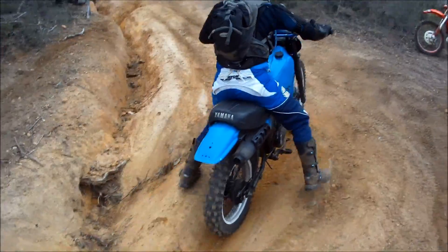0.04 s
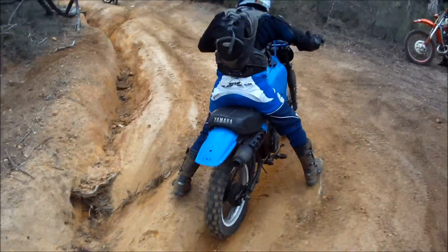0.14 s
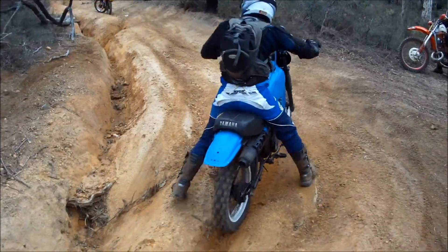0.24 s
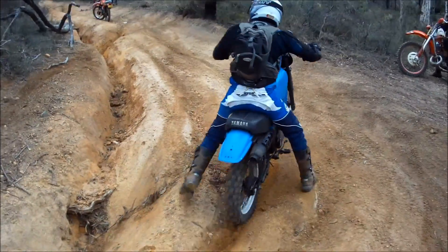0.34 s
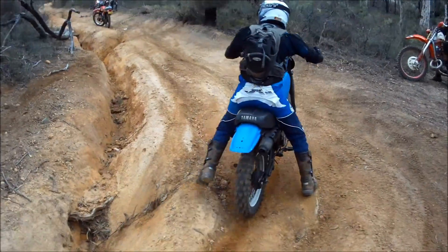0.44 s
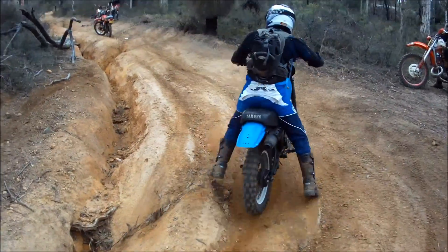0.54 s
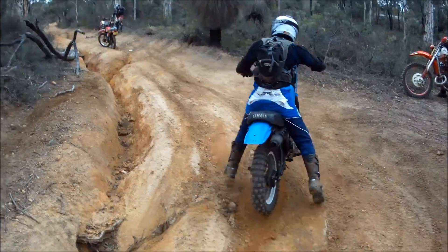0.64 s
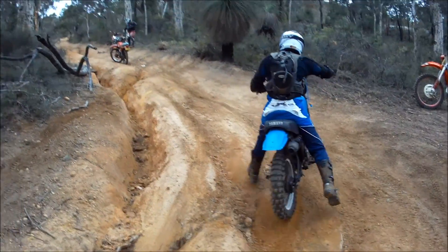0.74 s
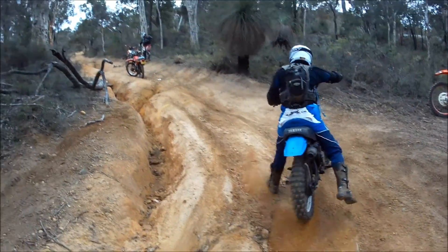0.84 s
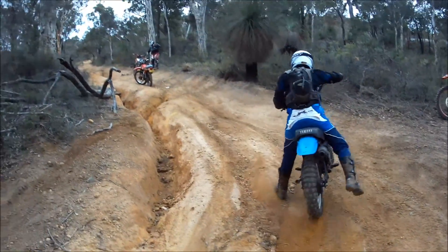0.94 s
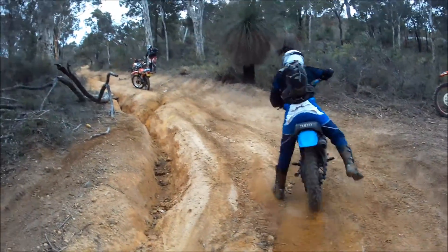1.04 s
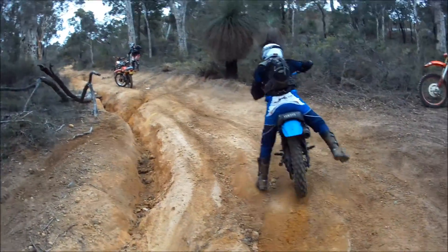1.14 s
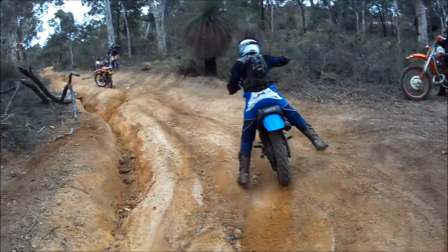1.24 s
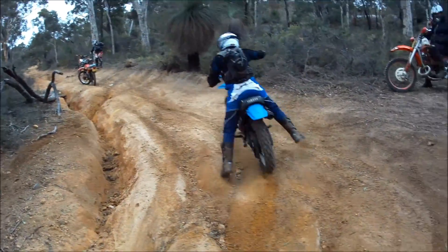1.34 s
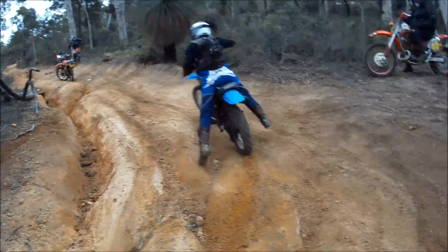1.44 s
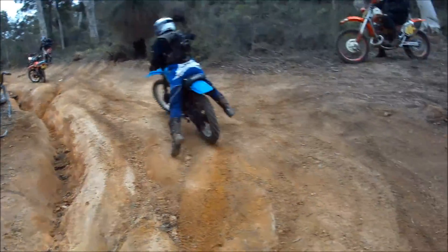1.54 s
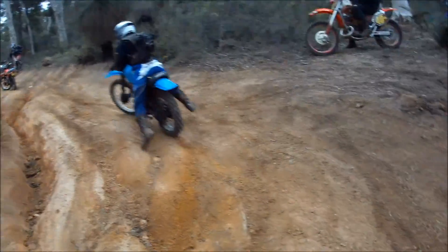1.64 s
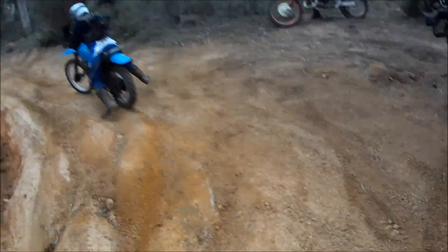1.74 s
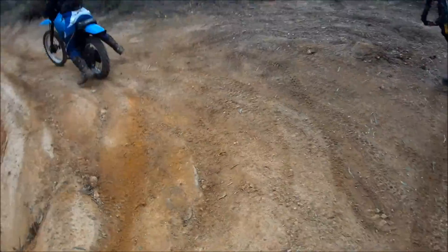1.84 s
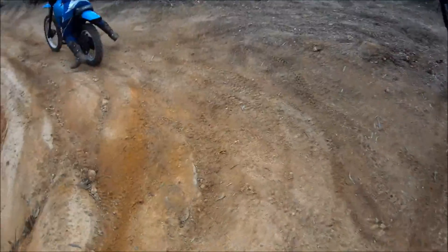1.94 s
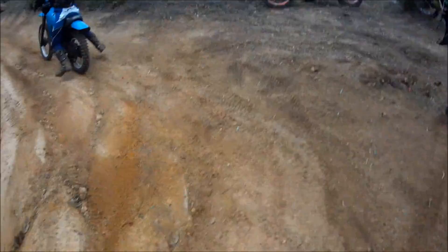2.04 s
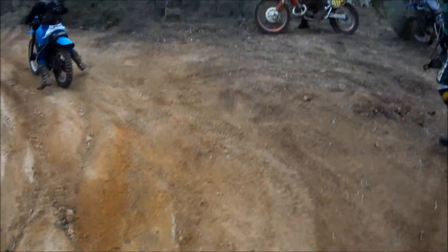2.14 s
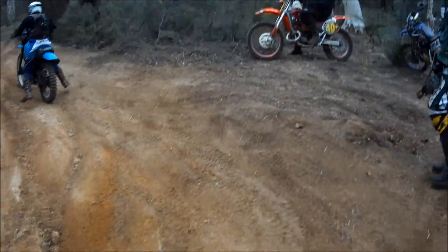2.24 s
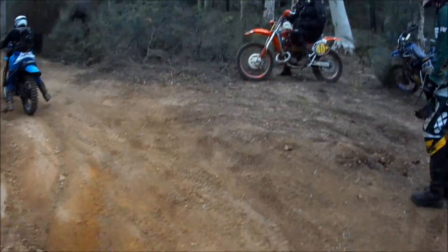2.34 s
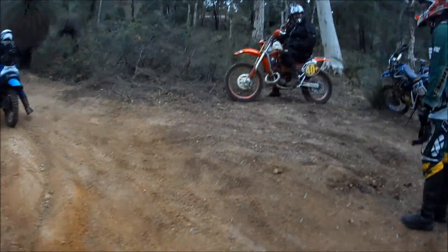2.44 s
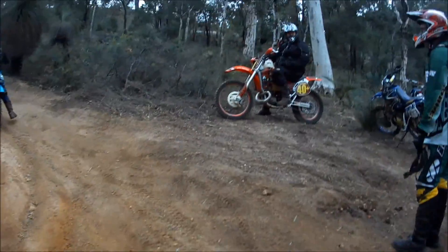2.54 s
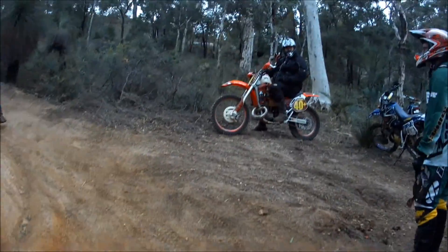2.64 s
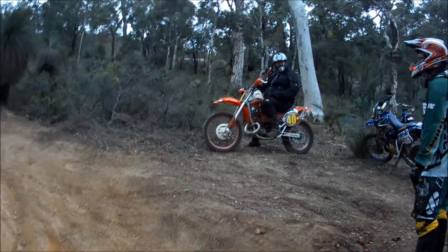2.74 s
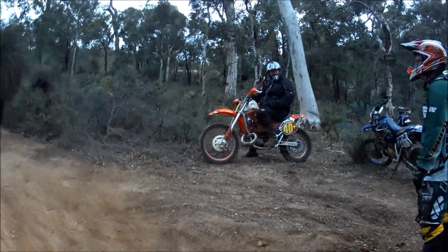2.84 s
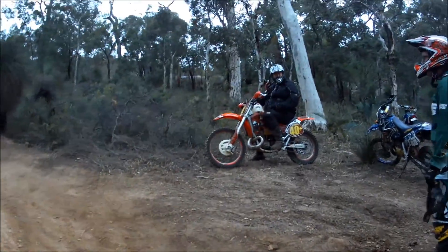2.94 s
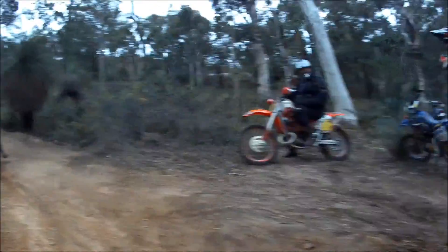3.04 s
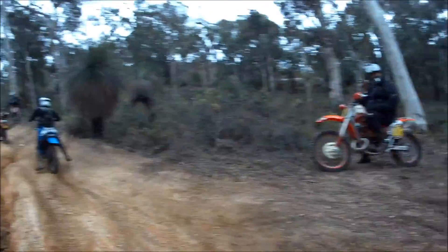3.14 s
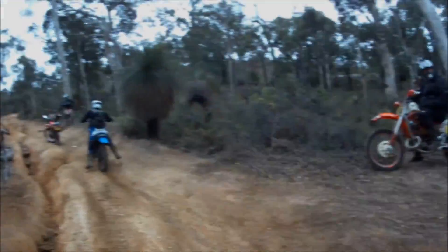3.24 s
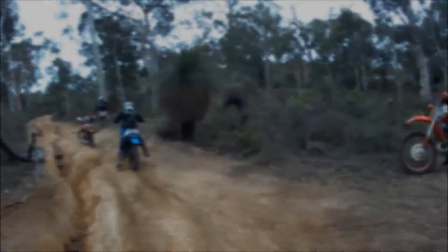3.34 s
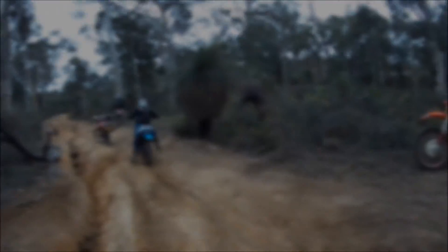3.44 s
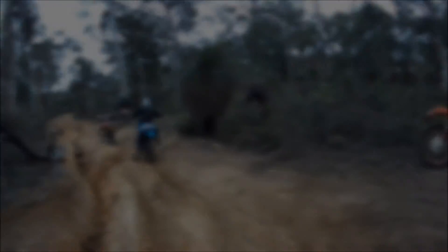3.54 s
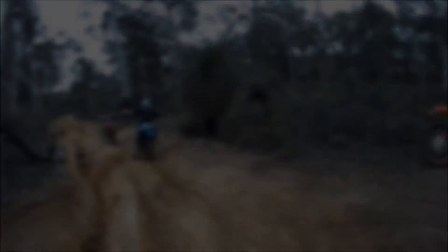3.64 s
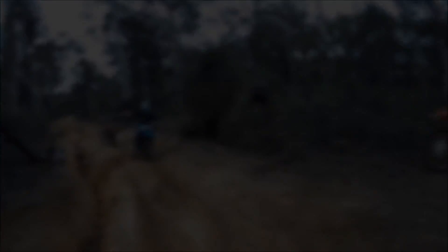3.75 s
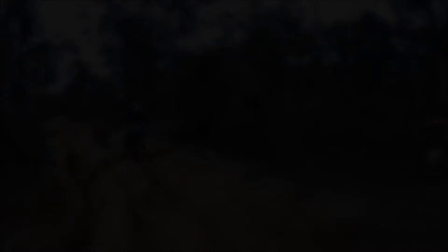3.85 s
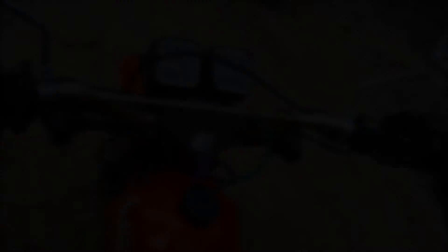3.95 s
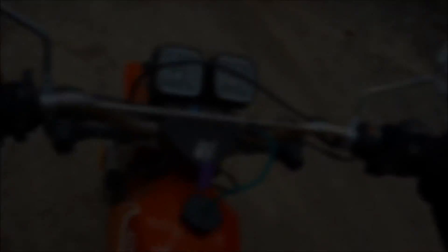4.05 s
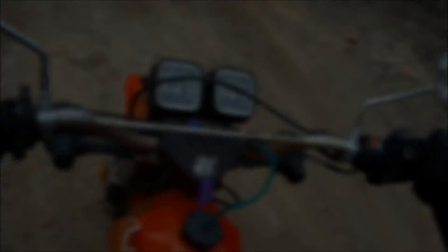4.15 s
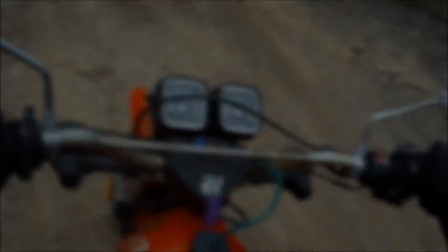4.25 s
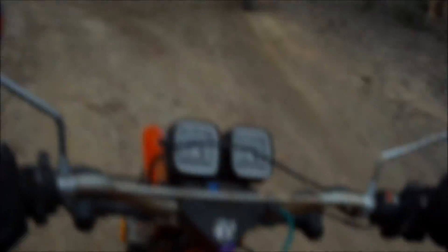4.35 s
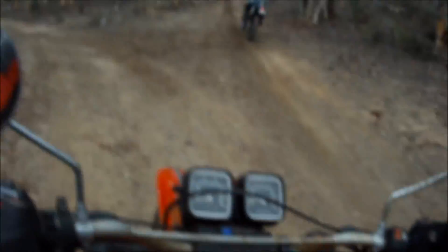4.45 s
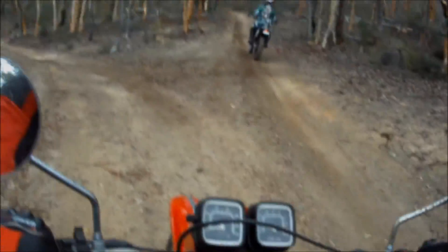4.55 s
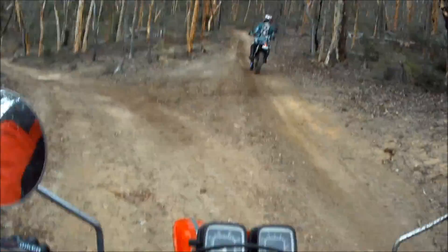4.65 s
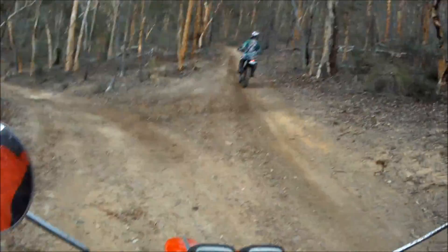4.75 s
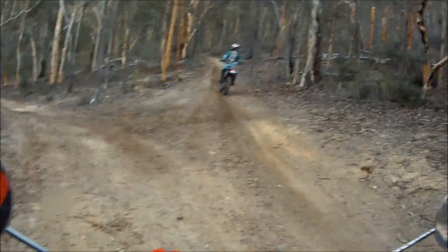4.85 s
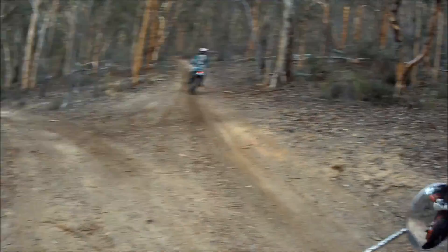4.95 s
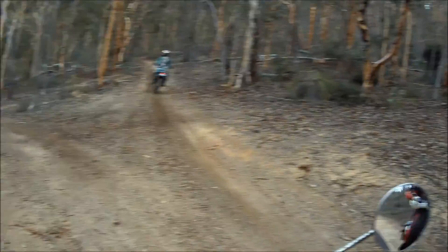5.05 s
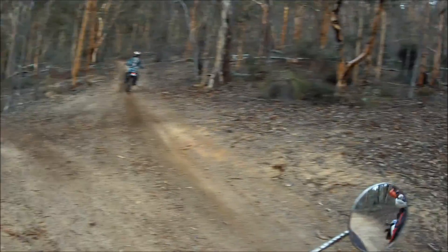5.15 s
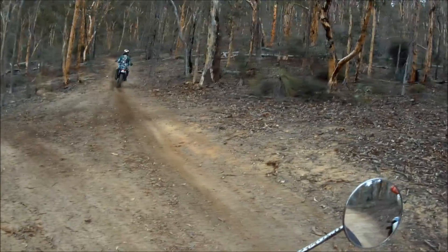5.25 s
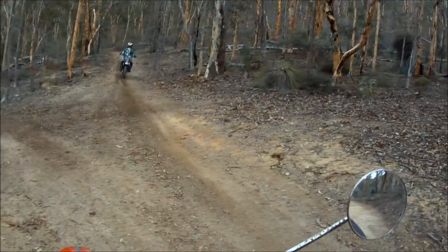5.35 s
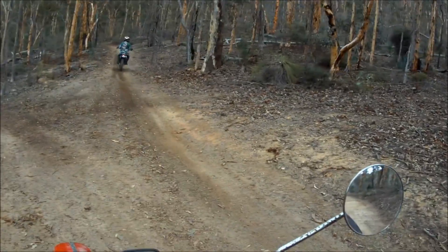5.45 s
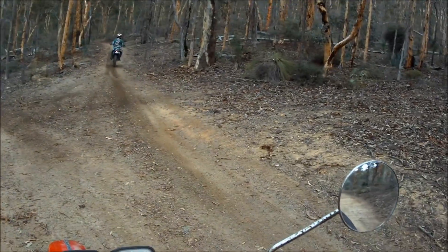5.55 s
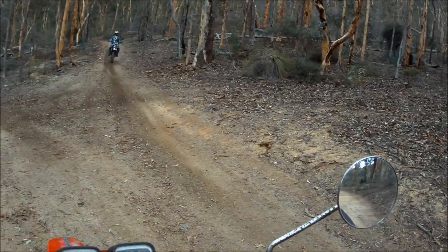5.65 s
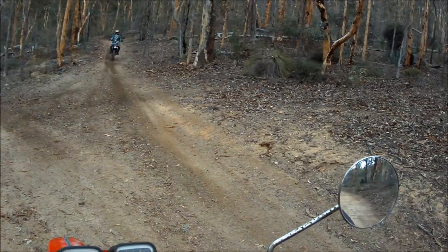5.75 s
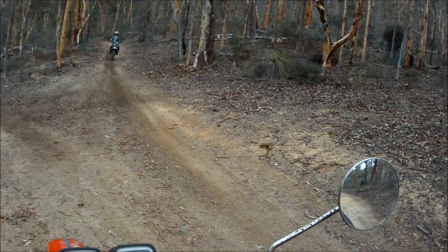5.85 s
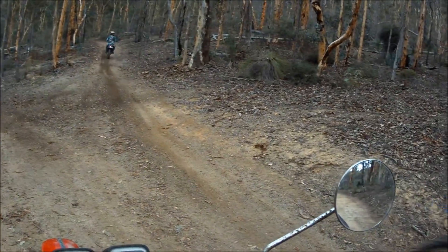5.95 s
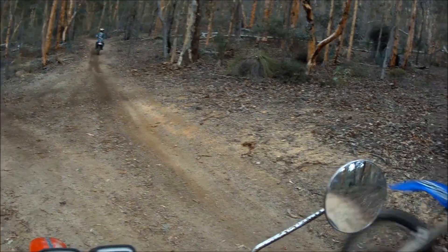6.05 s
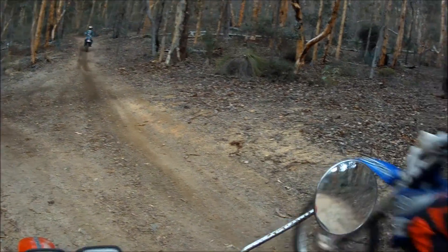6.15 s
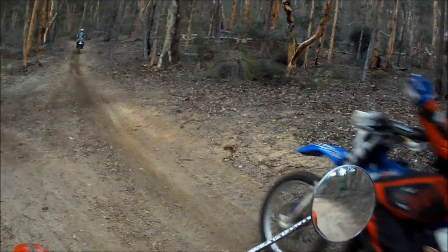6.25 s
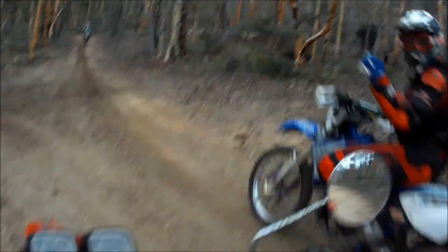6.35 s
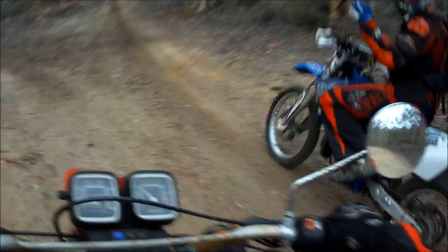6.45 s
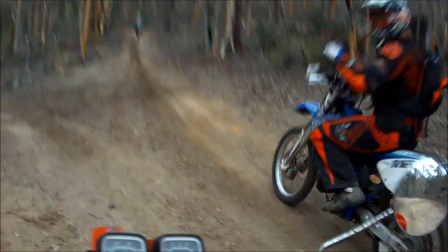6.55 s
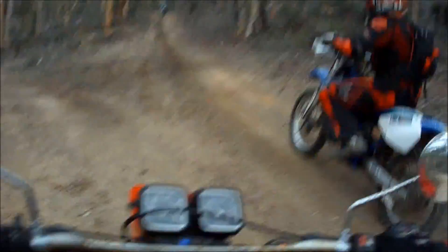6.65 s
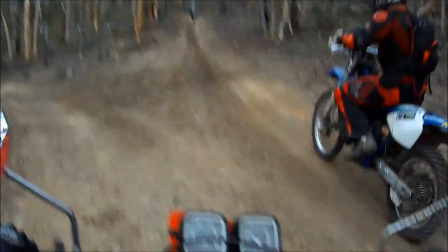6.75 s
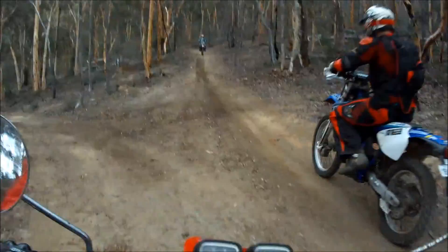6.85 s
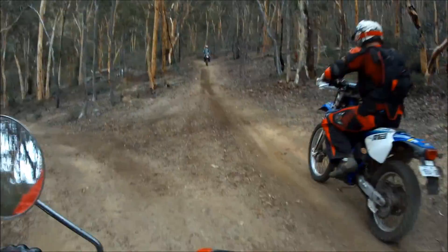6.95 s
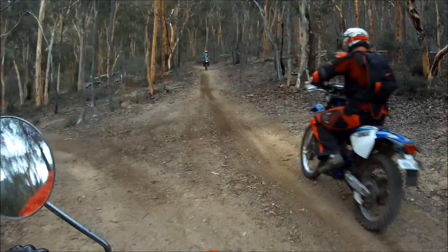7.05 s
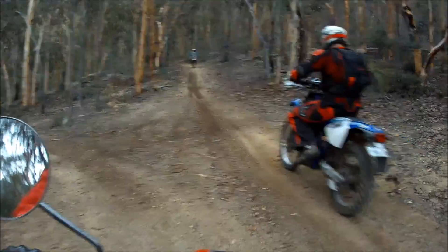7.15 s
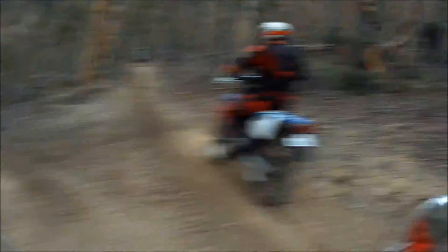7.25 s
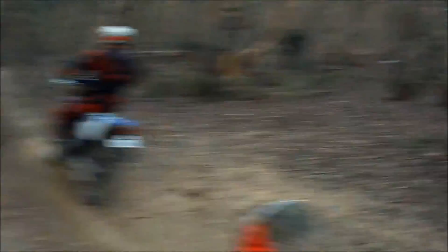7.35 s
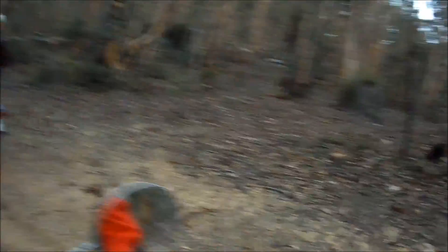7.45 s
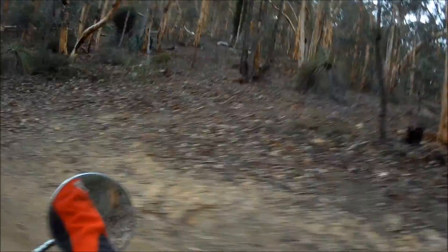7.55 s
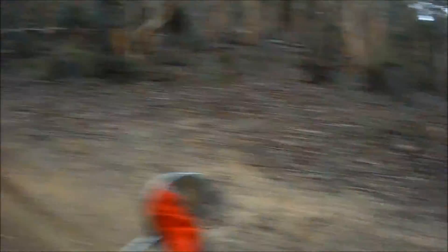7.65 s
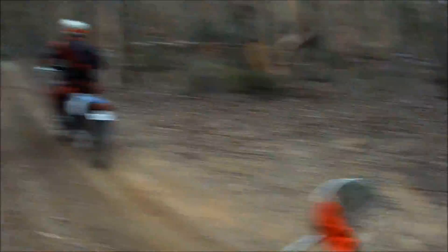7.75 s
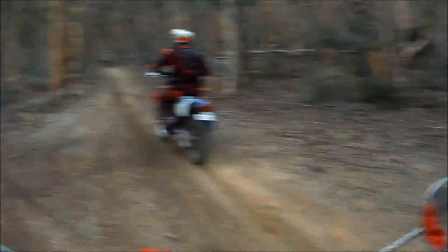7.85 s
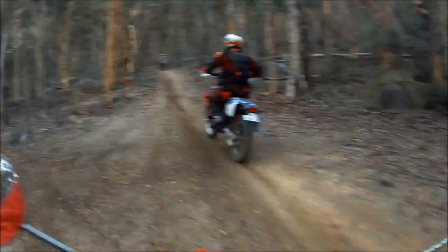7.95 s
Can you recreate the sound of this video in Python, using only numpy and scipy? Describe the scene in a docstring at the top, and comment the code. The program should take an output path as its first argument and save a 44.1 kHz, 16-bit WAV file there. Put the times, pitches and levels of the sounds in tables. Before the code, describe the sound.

A helmet-mounted microphone with a boxy, hissy resonance hears dirt bikes on a bush trail in a light breeze. From 0 s a two-stroke putters away, its rapid firing pulses booming, rattling and rasping in uneven throttle bursts. Around 2 s it drops sharply to a slower popping idle, lifting slightly at 2.5 s. At about 3.2 s it gives way abruptly to the wearer's close idle, clattering and misfiring, while another bike's blurred rasp recedes, gone by 5.3 s. Dull knocks fall around 3.2 to 4.7 s, with a brief gear rub at 4.2 s and small clicks after. From 5.7 s the wearer revs, peaking near 6.2 s, easing, then rising again by 7.9 s with a steady hollow ring. From 6.4 s a third bike knocks slowly alongside; after 7.1 s its knocks merge into a bark and whistle, still accelerating at 8 s, the bark fading slightly.

```python
"""Dirt bikes on a bush trail, heard through the resonant housing of a helmet camera, over a light breeze. First
a two-stroke putters away and drops to idle; its firing pulses excite pipe modes and bursts of noise. At about
3.2 s it stops, and the wearer's misfiring idle and a bike pulling away up the trail set in. Gear then rubs and
clicks nearby. From 5.7 s the wearer revs, and a third bike knocks past and accelerates, its knocks merging into
a bark and a whistle. Every layer but a slow pressure swing is a train of pulses or shaped noise."""
import sys
import numpy as np
from scipy import signal
from scipy.io import wavfile
from scipy.ndimage import uniform_filter1d

SR = 44100
rng = np.random.default_rng(int(sys.argv[2]) if len(sys.argv) > 2 else 0)


def persist_wave(psi):
    """Save psi, clipped to +-1, as 16-bit WAV."""
    counts = np.round(np.clip(psi, -1, 1) * 32767).astype(np.int16)
    wavfile.write(sys.argv[1], SR, np.atleast_2d(counts).T)


N = 353241
TIME = np.arange(N) / SR  # s

# Crank speed of each bike, one firing a turn: (time [s], firing rate [1/s])
LEAVING_RATE = [(-0.02, 29.2), (0.17, 33.5), (0.4, 29.0), (0.6, 35.1), (0.73, 36.9), (0.93, 34.9),
                (1.2, 36.4), (1.55, 30.1), (1.85, 26.5), (2.0, 22.8), (2.2, 17.5), (2.45, 21.8),
                (2.65, 23.4), (2.77, 22.1), (2.9, 23.9), (3.15, 23.6)]
OWN_RATE = [(3.13, 24.0), (3.5, 23.6), (4.7, 23.5), (5.1, 22.4), (5.4, 24.4), (5.7, 25.1), (5.9, 30.3),
            (6.1, 48.8), (6.23, 55.3), (6.38, 53.6), (6.8, 41.6), (7.35, 40.8), (7.65, 45.0), (7.9, 54.0),
            (8.01, 54.3)]
AHEAD_RATE = [(3.16, 35.6), (3.45, 40.3), (5.0, 39)]
PASSING_RATE = [(6.39, 20.0), (6.55, 16.3), (6.78, 19.1), (6.92, 24.8), (7.1, 30.5), (7.2, 44.0),
                (7.3, 52.9), (7.45, 51.6), (7.62, 55.3), (7.77, 57.6), (7.9, 66.4), (8.01, 67.8)]
# How hard the leaving bike fires as its rider works the throttle: (time [s], level [dB])
LEAVING_EFFORT = [(0, -1), (0.55, 2.5), (0.68, -4), (0.9, 1), (1.3, 0.5), (1.86, 2.4), (2.12, -11.5),
                  (2.46, 1.5), (3.0, -2.6)]
# Steady rush between strokes as the leaving pipe turns away: (time [s], share of the burst [ratio])
LEAVING_BLUR = [(0.55, 0.62), (0.7, 0.95)]
# Spells of misfiring at the wearer's idle: (start [s], length [s])
MISFIRES = [(3.24, .11), (3.54, .12), (3.75, .08), (3.91, .05), (4.12, .13), (4.50, .09), (4.67, .09),
            (4.93, .09), (5.15, .05), (5.36, .05), (5.53, .08)]
# Pitch reinforced by the passing bike's ground echo as the head turns: (time [s], frequency [Hz])
ECHO_PITCH = [(7.0, 5200), (7.3, 5360), (7.45, 4360), (7.6, 4050), (7.7, 6100), (7.82, 4940), (8.01, 5000)]
# Pitch of the passing bike's pipe whistle: (time [s], frequency [Hz])
WHISTLE_PITCH = [(6.6, 1940), (6.95, 2100), (7.17, 2140), (7.36, 1917), (7.6, 1940), (7.75, 2110),
                 (7.95, 1830)]

# Modes of pipe, silencer mouth, cylinder fins and idle pop: (frequency [Hz], bandwidth [Hz], level [dB])
LEAVING_BOOM = [(66, 6.9, -3), (163.6, 24, 7.5), (248, 180, -5.5), (320, 68, -13)]
LEAVING_BARK = [(327, 67, -11), (420, 113, -1.5), (483.6, 16, 7.5), (549, 20, 5), (790, 28, -32),
                (945, 9.3, 3), (1130, 12, 9)]
LEAVING_MOUTH = [(322, 44, 4), (484, 120, -4)]
LEAVING_FINS = [(978, 41, -1), (1684, 53, -3.5), (3415, 89, 3.5), (5330, 110, -5.5), (7150, 220, -10)]
IDLE_POP = [(285, 29, 0)]
# Exhaust modes of the wearer's and the passing bike: (frequency [Hz], bandwidth [Hz], level [dB])
OWN_BOOM = [(66.5, 52, -0.5), (121, 33, 0), (139.6, 20, 7), (199, 240, -7)]
OWN_SILENCER = [(266, 35, -18), (296, 47, -17), (313.2, 41, 22.5), (361, 59, 14.5), (546, 36, -13),
                (890, 82, -15)]
PASSING_BOOM = [(102, 34, 9.5), (237, 26, 21.5), (270, 33, -15)]
PASSING_BARK = [(368, 27, 9.5), (533, 28, 13.5), (710, 50, -17), (969, 21, 12), (1154, 30, 13),
                (1245, 41, 9), (1640, 310, 2), (1970, 22, 2)]
# Resonances and notches of the camera housing: (frequency [Hz], half width [Hz], gain [dB])
HOUSING = [(1332, 213, -7.5), (1570, 247, 6), (1950, 150, 4), (2390, 178, -8.5), (3420, 238, 13),
           (3760, 130, 2), (4226, 130, 4), (4900, 69, -6), (5300, 113, 2.5), (6190, 71, 6),
           (6420, 160, -6.5), (7260, 150, 7.5), (7970, 293, -11), (8690, 140, 3)]

# Spectra of the engine noises; RASP serves the leaving bike and the bike ahead: (frequency [Hz], level [dB])
LEAVING_CLATTER = [(200, -8), (600, -8), (1000, -6.5), (1800, -2.5), (3400, -5), (4200, -8.5), (6000, -24)]
RASP = [(2000, -26), (3500, -21), (4300, 8.5), (7200, 3), (8800, -3), (10500, -4.5), (12000, -28),
        (15000, -58)]
OWN_CLATTER = [(150, -8), (450, 4), (680, -5), (900, 3), (1250, -9.5), (1620, 0), (2100, -8.5),
               (3400, -13.5), (4200, -39), (6000, -37)]
OWN_RASP = [(2000, -25.5), (3500, -3.5), (4300, 8), (7200, 6), (8800, -3), (10800, -1.5), (12000, -13),
            (15000, -12)]
AHEAD_RASP = [(600, -5), (1300, 7), (2300, -1.5), (3400, 1.5), (4500, -12), (8000, -18.5)]
PASSING_RASP = [(300, -10), (900, -1.5), (1900, -2), (3300, -15), (4300, -3.5), (5400, -4.5), (7200, -8.5),
                (8800, -18.5), (12000, -26), (15000, -36)]
# Spectra of the background and of contact sounds: (frequency [Hz], level [dB])
AIR = [(30, -38), (150, 1), (400, -8.5), (1000, 0), (1800, -3), (3000, -30.5), (7000, -12), (12000, -23),
       (15000, -23)]
WIND = [(15, 25.5), (30, 6.5), (50, 13), (80, 8), (150, -38), (600, -81)]
THUD = [(80, 4), (300, -24), (950, -7.5), (1700, -14.5), (3000, -33), (10000, -36)]
SCRAPE = [(200, -17), (1000, -1), (2000, 6), (3400, 4), (5000, -2), (7200, -10), (10000, -14), (15000, -30)]
CLICK = [(400, -2), (2000, -24), (4000, 2.5), (7000, 4), (10000, -9), (15000, -17)]

# Gusts on the microphone: (time [s], half length [s], level [dB])
GUSTS = [(1.75, .15, -44), (3.135, 0.063, -44.5), (3.883, .05, -41), (4.158, 0.2, -45), (5.88, 0.044, -42),
         (6.6, 0.29, -45), (7.498, 0.52, -41.5)]
# Dull knocks of the chassis: (time [s], level [dB])
KNOCKS = [(1.912, -34), (3.212, -33), (3.86, -27.5), (3.888, -43), (4.077, -25.5), (4.228, -30),
          (4.70, -37)]
# Sharp clicks of stones and controls: (time [s], level [dB])
CLICKS = [(4.305, -36), (4.336, -33), (4.478, -41), (6.08, -29.5), (6.444, -27.5), (6.96, -23.5),
          (7.181, -24), (7.459, -31)]

# Layers of the leaving bike: (level [dB], effort slope [dB/dB],
# distance slope [dB per doubling], speed slope [dB per doubling])
LEAVING_LAWS = {"boom": (-42.5, 1.0, -4.5, 2), "bark": (-50, 0.6, -5, 23), "mouth": (-42.5, 0.9, -32, 3),
                "fins": (-44, 1.2, -6.5, 8.5), "clatter": (-35, 0.5, -12.5, 2.5),
                "rasp": (-37.5, 1.0, -12.5, 1)}
# Layers of the wearer's bike: (idle level [dB], open-throttle gain [dB], speed slope [dB per doubling])
OWN_LAWS = {"boom": (-48.5, -0.66, 4.8), "silencer": (-43.5, 6.76, 0.5), "clatter": (-44.5, -0.59, 4.5),
            "rasp": (-54.5, 3.9, 8.5)}
# Layers of the passing bike: (idle level [dB], open-throttle gain [dB], alongside gain [dB])
PASSING_LAWS = {"boom": (-63.5, 26.7, 1), "bark": (-59, 21.1, 2.4), "whistle": (-50.5, 7.2, 2.4),
                "rasp": (-43, 9.3, 7.1)}

RECEDE_PER_S = 0.56  # distance gained by the leaving bike, in starting distances per second
IDLE_FROM_S, IDLE_SETTLE_S, IDLE_POP_DB = 2.22, 0.17, -55.5
OWN_OPENS_S, OWN_OPENING_S, MISFIRE_DB = 5.665, 0.34, -8
OWN_WARMING, OWN_RING_SPREAD = 0.068, 0.029  # share the ring rises under throttle, and varies at idle
AHEAD_FROM_S, AHEAD_DB, AHEAD_RECEDE_PER_S = 3.16, -42, 1.9
RUB_S, RUB_RISE_S, RUB_HOLD_S, RUB_FALL_S, RUB_DB = 4.17, 0.037, 0.14, 0.049, -32
PASS_OPENS_S, PASS_OPENING_S = 7.12, 0.16
ALONGSIDE_S, ALONGSIDE_WIDTH_S = 6.76, 0.4
BARK_ENDS_S, BARK_FADE_S, BARK_FADE_DB = 7.76, 0.25, -12  # the bark dies back as the pipe turns away
WHISTLE_WIDTH_HZ = 41
BREEZE_DB = -49.5
SWIRL_DB, SIDE_SCATTER_DB = -9, -33  # gains of the opposed parts of wind and scatter at the two ports
EDGE_HZ = 15500


def amp(db):
    """Logarithmic level: converts decibels to an amplitude ratio."""
    return np.exp(np.asarray(db) * (np.log(10) / 20))


def curves(rows):
    """Linear interpolation: gives each column of a table a value at every sample."""
    s, *columns = np.transpose(rows)
    return [np.interp(TIME, s, c) for c in columns]


def gate(start, end, fade=0.0031):
    """Time window: one between two times, zero outside, with short linear edges."""
    return np.clip((TIME - start) / fade, 0, 1) * np.clip((end - TIME) / fade, 0, 1)


def ramp(start, length):
    """Linear onset: rises from zero to one, then stays."""
    return np.clip((TIME - start) / length, 0, 1)


def swell(centre, width):
    """Gaussian envelope: a bell that reaches one at its centre."""
    return np.exp(-((TIME - centre) / width) ** 2)


def at_level(x, db, on):
    """Root-mean-square normalization: sets the level of a sound over its window."""
    windowed = x * on
    rms = np.sqrt(np.sum(windowed ** 2) / np.sum(on ** 2) + 1e-20)
    return windowed * amp(db) / rms


def mix(layers, laws, controls, on):
    """Superposition: sums layers whose levels in dB depend linearly on the controls."""
    total = 0
    for name, x in layers.items():
        base_db, *slopes = laws[name]
        total = total + at_level(x, base_db + np.dot(slopes, controls), on)
    return total


def colour(x, spectrum, size=4096):
    """Minimum-phase filtering: a source spectrum times the response of the housing."""
    hz = abs(np.fft.fftfreq(size, 1 / SR))
    f, db = np.transpose(spectrum)
    db = np.interp(np.log(hz + 1), np.log(f), db)
    for centre, width, gain in HOUSING:
        db = db + gain * np.exp(-((hz - centre) / width) ** 2)
    # the phase follows from the Hilbert transform of the log magnitude
    response = np.exp(np.conj(signal.hilbert(np.log(amp(db)))))
    impulse = np.fft.ifft(response).real[:size // 2]
    return signal.oaconvolve(x, impulse)[:N]


def ring(pulses, modes, stretch):
    """Modal resonance: each pulse starts decaying modes of alternate sign, their pitch scaled by stretch."""
    hz, width, db = np.transpose(modes)
    t, out = TIME[:SR // 10], np.zeros(N)
    strength = (-1) ** np.arange(len(hz)) * amp(db) * width
    decay = strength[:, None] * np.exp(-np.pi * np.outer(width, t))
    for i in np.flatnonzero(pulses):
        note = (decay * np.cos(2 * np.pi * stretch[i] * np.outer(hz, t))).sum(0)
        out[i:i + len(t)] += pulses[i] * note[:N - i]
    lowpass = signal.butter(N=4, Wn=0.95 * hz.max(), fs=SR, output="sos")
    return signal.sosfilt(lowpass, out)


def firings(rows):
    """Periodic excitation: one pulse a crank turn, scaled to keep nearly equal power at any speed."""
    s, hz = np.transpose(rows)
    rate = np.interp(TIME, s, hz, left=0)
    turns_before_zero = -min(s[0], 0) * hz[0]
    turns = np.floor(np.cumsum(rate) / SR + turns_before_zero)
    return np.diff(turns, prepend=turns[0]) / np.sqrt(rate + 1)


def uneven(pulses, spread_db):
    """Cyclic variation: each firing gets its own random strength."""
    out, at = pulses.copy(), np.flatnonzero(pulses)
    out[at] *= amp(spread_db * np.clip(rng.standard_normal(len(at)), -2, 2))
    return out


def puffs(pulses, delay, decay, steady, grain_db):
    """Modulated turbulence: a gritty noise burst after each firing [s, s], over a steady rush [ratio]."""
    t = np.maximum(TIME[:SR // 8] - delay, 0)
    shape = (1 - np.exp(-t / .0008)) * np.exp(-t / decay)
    burst = signal.oaconvolve(pulses, shape)[:N]
    mean_power = abs(uniform_filter1d(burst ** 2, size=11000))  # over a quarter second
    power = burst ** 2 + steady ** 2 * mean_power
    grains = amp(grain_db * np.clip(rng.standard_normal(N // 32 + 1), -2, 2))
    grit = np.repeat(grains, 32)[:N]
    return np.sqrt(power) * grit * rng.standard_normal(N)


def leaving_bike():
    """Pulse-excited resonance: each firing booms in the pipe, rattles the cylinder, spits from the silencer."""
    fire, on = firings(LEAVING_RATE), gate(-1, 3.18)
    speed = curves(LEAVING_RATE)[0] / 31.5
    blur = curves(LEAVING_BLUR)[0]
    clatter = puffs(fire, delay=0.0022, decay=0.012, steady=blur, grain_db=2.4)
    rasp = puffs(uneven(fire, spread_db=1.2), delay=0.0016, decay=0.0056, steady=blur, grain_db=1.8)
    layers = dict(
        boom=ring(fire, LEAVING_BOOM, speed ** .5),
        bark=ring(uneven(fire, spread_db=0.3), LEAVING_BARK, speed ** 0.12),
        mouth=ring(fire, LEAVING_MOUTH, np.ones(N)),
        fins=ring(uneven(fire, spread_db=0.8), LEAVING_FINS, np.ones(N)),
        clatter=colour(clatter, LEAVING_CLATTER),
        rasp=colour(rasp, RASP))
    distance = 1 + RECEDE_PER_S * TIME
    controls = [curves(LEAVING_EFFORT)[0], np.log2(distance), np.log2(speed)]
    # back at idle, each firing also pops in the pipe
    idle = on * ramp(IDLE_FROM_S, IDLE_SETTLE_S)
    pop = at_level(ring(fire, IDLE_POP, np.ones(N)), IDLE_POP_DB, idle)
    return mix(layers, LEAVING_LAWS, controls, on) + pop


def trees(x, t60=0.41):
    """Multiple scattering: sparse random echoes from trunks and ground decay by 60 dB in t60 seconds."""
    t = TIME[:SR // 2]
    present = (rng.random(len(t)) < 2000 / SR) * (t > .006)  # 2000 echoes a second, after 6 ms
    taps = rng.standard_normal(len(t)) * present * amp(-60 * t / t60)
    return signal.oaconvolve(x, taps / np.linalg.norm(taps))[:N]


def air():
    """Stationary noise: a faint shaped background."""
    return at_level(colour(rng.standard_normal(N), AIR), -51.5, np.ones(N))


def wind():
    """Turbulent pressure: low-frequency noise rumbles with a light breeze and a few gusts."""
    strength = amp(BREEZE_DB) + sum(amp(db) * swell(s, width) for s, width, db in GUSTS)
    return strength * at_level(colour(rng.standard_normal(N), WIND), 0, np.ones(N))


def hits(rows, spectrum, decay):
    """Impact excitation: exponentially decaying noise bursts, each at its own level."""
    out, t = np.zeros(N), TIME[:SR // 16]
    for s, db in rows:
        burst = np.exp(-t / decay) * rng.standard_normal(len(t))
        out[round(s * SR):][:len(t)] += amp(db) * burst
    filter_gain = np.std(colour(rng.standard_normal(N), spectrum))
    return colour(out, spectrum) / filter_gain


def own_bike():
    """Forced resonance: the silencer rings weakly on a misfire, while the piston clatters on every turn."""
    turn, on = firings(OWN_RATE), gate(3.155, 9)
    speed = curves(OWN_RATE)[0] / 24
    skipped = sum((TIME > s) & (TIME < s + length) for s, length in MISFIRES)
    fire = turn * amp(MISFIRE_DB * skipped)
    throttle = ramp(OWN_OPENS_S, OWN_OPENING_S)
    heat = 1 + OWN_WARMING * throttle + OWN_RING_SPREAD * (1 - throttle) * rng.standard_normal(N)
    clatter = puffs(uneven(turn, spread_db=2), delay=0.012, decay=0.033, steady=0.92, grain_db=2.5)
    rasp = puffs(uneven(turn, spread_db=1), delay=0.0011, decay=0.0036, steady=1.14, grain_db=2.0)
    layers = dict(
        boom=ring(uneven(turn, spread_db=2), OWN_BOOM, speed ** 0.089),
        silencer=ring(uneven(fire, spread_db=1.6), OWN_SILENCER, heat),
        clatter=colour(clatter, OWN_CLATTER),
        rasp=colour(rasp, OWN_RASP))
    return mix(layers, OWN_LAWS, [throttle, np.log2(speed)], on)


def bike_ahead():
    """Distance attenuation: blurred strokes and a faint bark fall as 1/distance, their hiss faster still."""
    fire = firings(AHEAD_RATE)
    on = gate(AHEAD_FROM_S, 9) * (1 - ramp(4.8, .5))
    distance = 1 + AHEAD_RECEDE_PER_S * np.maximum(TIME - AHEAD_FROM_S, 0)
    strokes = puffs(fire, delay=0.0023, decay=0.011, steady=1.9, grain_db=3.5)
    bark = at_level(ring(fire, LEAVING_BARK, np.full(N, 1.1)), AHEAD_DB - 6.5, on)
    rasp = at_level(colour(strokes, AHEAD_RASP), AHEAD_DB + 1.5, on)
    hiss = at_level(colour(strokes, RASP), AHEAD_DB + 0.5, on)
    return (bark + rasp + hiss / distance ** 0.33) / distance


def scrape(slips_per_s=220):
    """Stick-slip friction: gear drags past the housing in randomly timed slips."""
    slips = 1. * (rng.random(N) < slips_per_s / SR)
    grit = puffs(slips, delay=0, decay=0.0066, steady=0.65, grain_db=2.5)
    release_s = RUB_S + RUB_RISE_S + RUB_HOLD_S
    pressure = ramp(RUB_S, RUB_RISE_S) - ramp(release_s, RUB_FALL_S)
    return at_level(colour(grit, SCRAPE), RUB_DB, pressure)


def sway(centre=6.555, length=.22, hz=4.5, db=-19):
    """Quasi-static pressure: a quick swing of the head presses air slowly in and out of the ports."""
    return -amp(db) * swell(centre, length) * np.sin(2 * np.pi * hz * (TIME - centre))


def passing_bike():
    """Pulse fusion: separate knocks at low speed merge into a bark as firing quickens and throttle opens."""
    fire, on = firings(PASSING_RATE), gate(6.39, 9)
    heat = (curves(PASSING_RATE)[0] / 54) ** 0.054
    boom = ring(uneven(fire, spread_db=0.5), PASSING_BOOM, heat)
    bark = ring(uneven(fire, spread_db=0.2), PASSING_BARK, heat)
    bark = bark * amp(BARK_FADE_DB * ramp(BARK_ENDS_S, BARK_FADE_S))
    rasp = puffs(uneven(fire, spread_db=2), delay=0.0013, decay=0.0092, steady=0.33, grain_db=2.5)
    rasp = colour(rasp, PASSING_RASP)
    # the ground echo, two periods late, combs the hiss
    echo_delay = 2 / curves(ECHO_PITCH)[0]
    rasp = rasp + 0.4 * np.interp(TIME - echo_delay, TIME, rasp)
    pitch = curves(WHISTLE_PITCH)[0]
    whistle_mode = [(pitch.max(), WHISTLE_WIDTH_HZ, 0)]
    whistle = ring(uneven(fire, spread_db=2), whistle_mode, pitch / pitch.max())
    layers = dict(boom=boom, bark=bark, whistle=whistle, rasp=rasp)
    controls = [ramp(PASS_OPENS_S, PASS_OPENING_S), swell(ALONGSIDE_S, ALONGSIDE_WIDTH_S)]
    return mix(layers, PASSING_LAWS, controls, on)


def scene():
    """Stereo superposition: all is central but parts of the wind and scatter, opposed at the two ports."""
    sides = np.array([[1], [-1]])
    bikes = leaving_bike() + own_bike() + bike_ahead() + passing_bike()
    scatter = amp(-11.5) * trees(bikes) + amp(SIDE_SCATTER_DB) * trees(bikes) * sides
    near = hits(KNOCKS, THUD, decay=.006) + scrape() + hits(CLICKS, CLICK, decay=.004)
    breeze = wind() + amp(SWIRL_DB) * wind() * sides
    return bikes + scatter + near + air() + breeze + sway()


def record(dry):
    """Band limitation: a linear-phase low-pass removes the highest treble."""
    lowpass = signal.firwin(511, EDGE_HZ, window=("kaiser", 9), fs=SR)
    return signal.oaconvolve(dry, lowpass[None], "same")


dry = scene()
out = record(dry)
persist_wave(out)
```